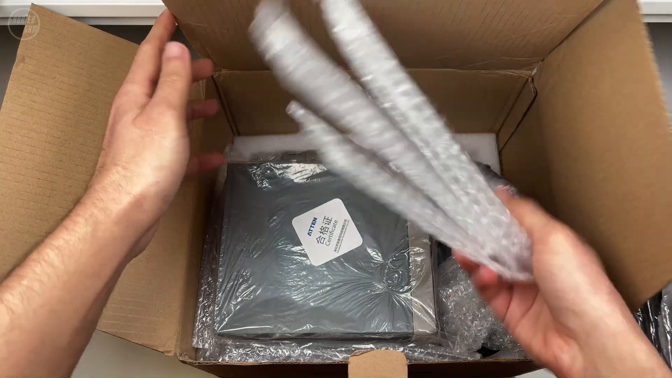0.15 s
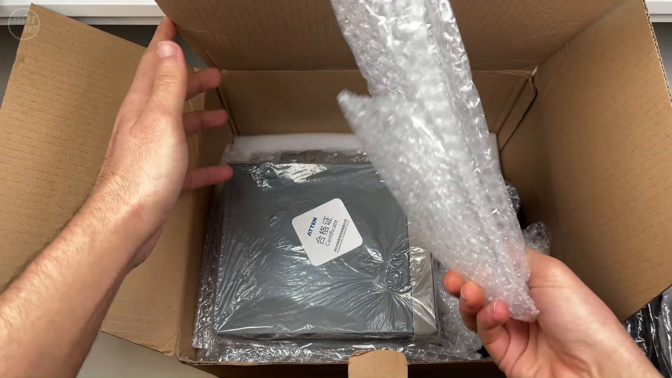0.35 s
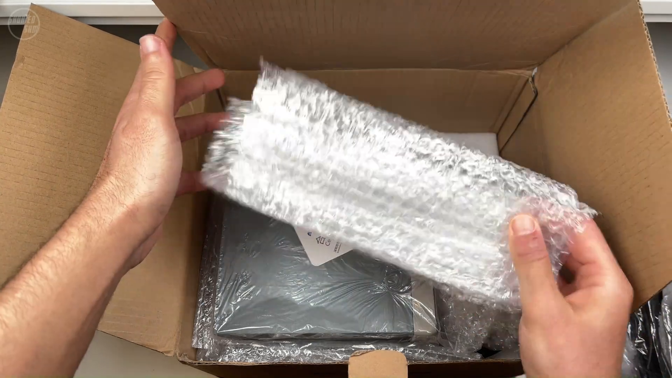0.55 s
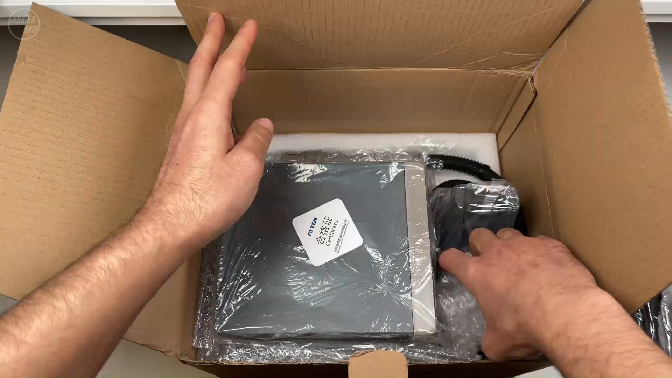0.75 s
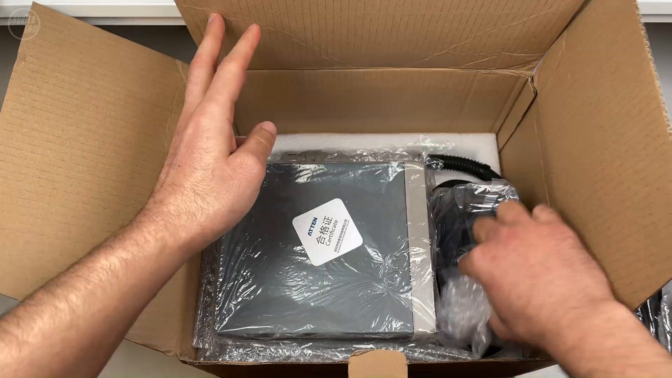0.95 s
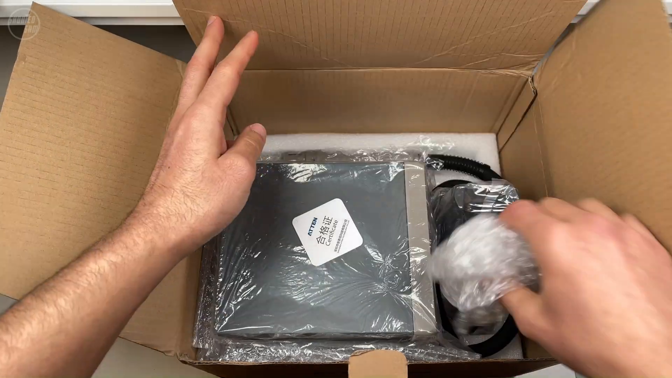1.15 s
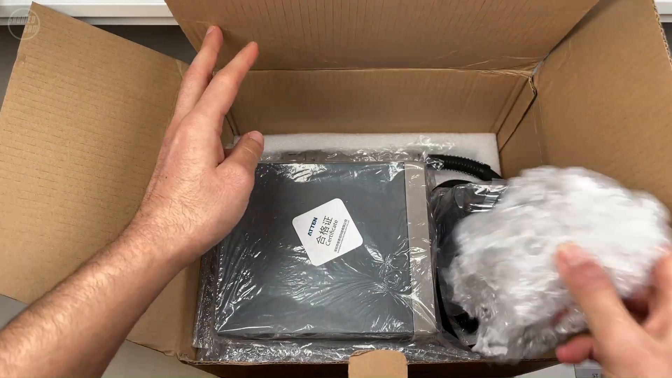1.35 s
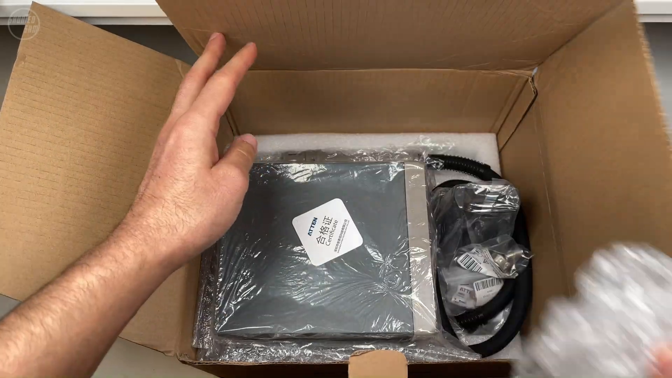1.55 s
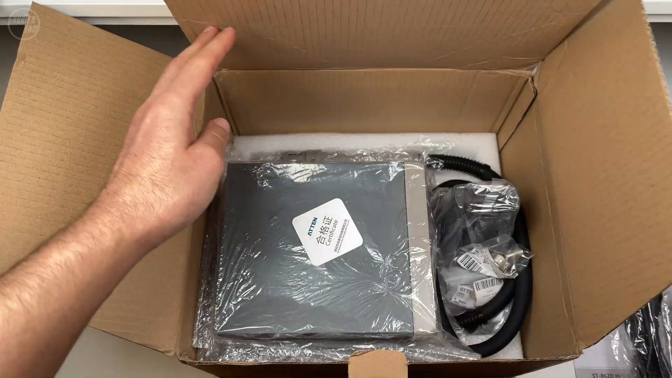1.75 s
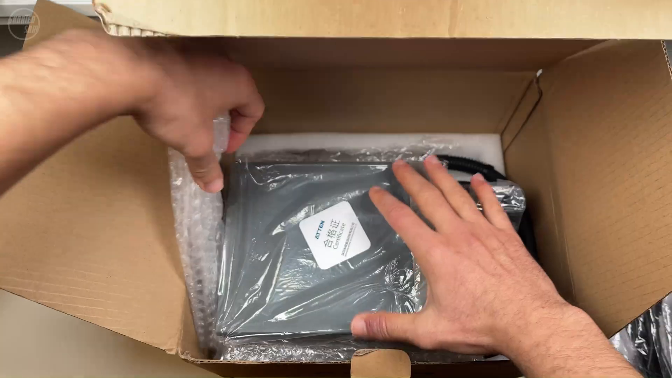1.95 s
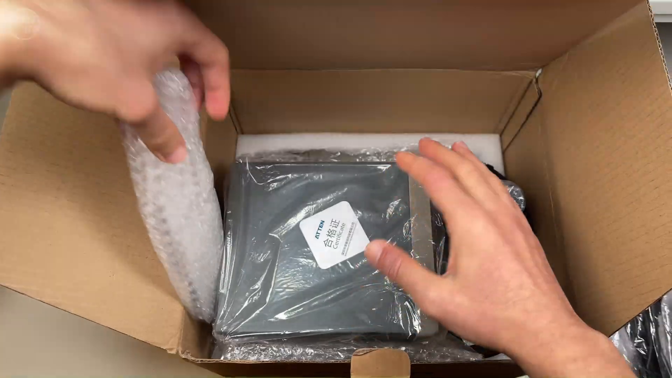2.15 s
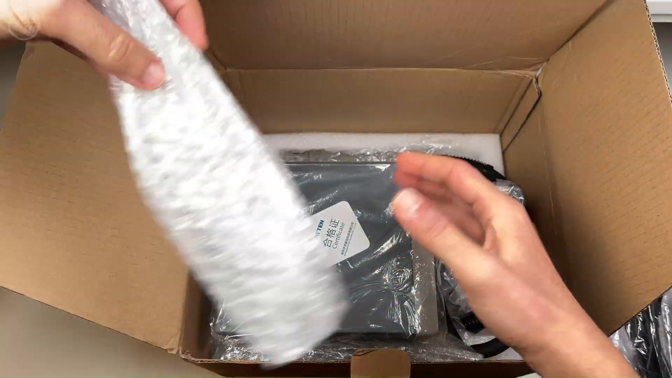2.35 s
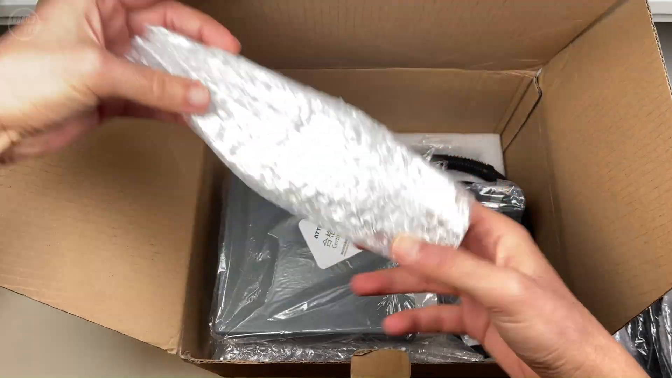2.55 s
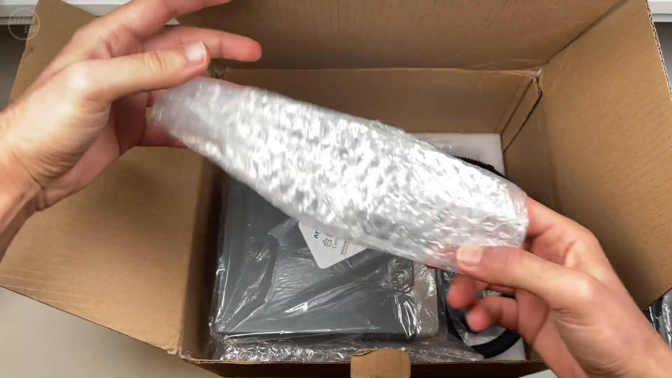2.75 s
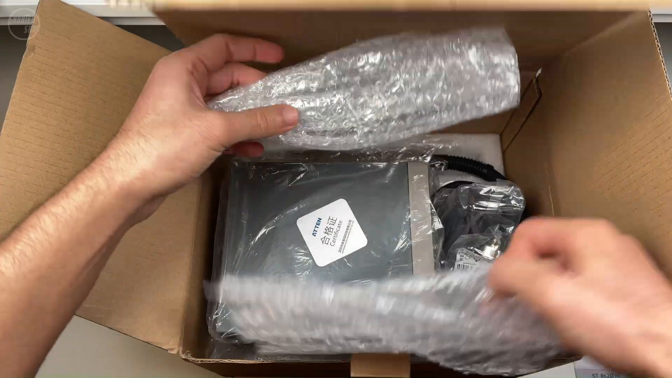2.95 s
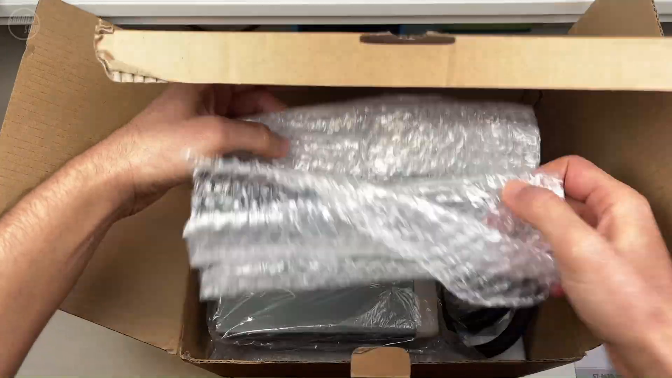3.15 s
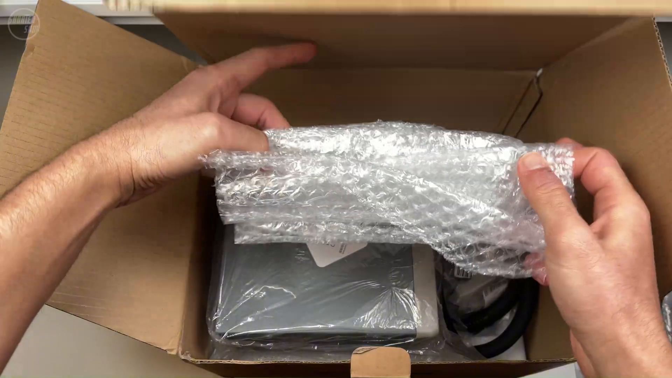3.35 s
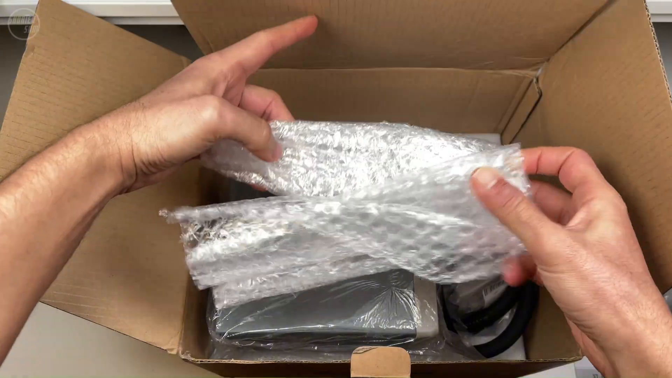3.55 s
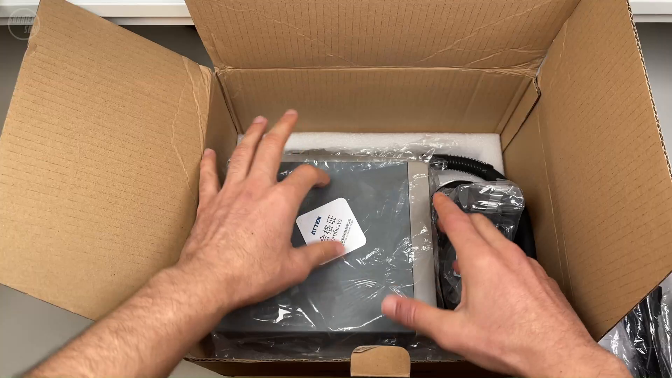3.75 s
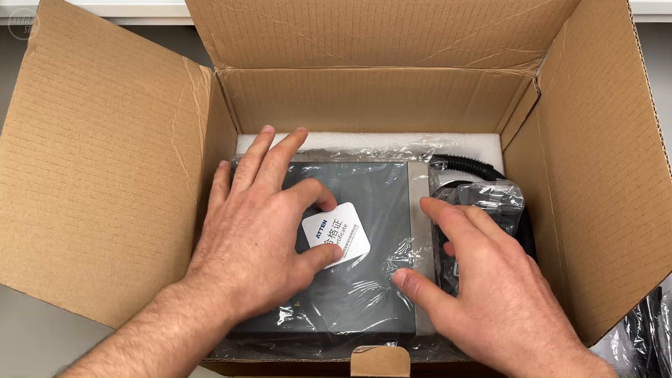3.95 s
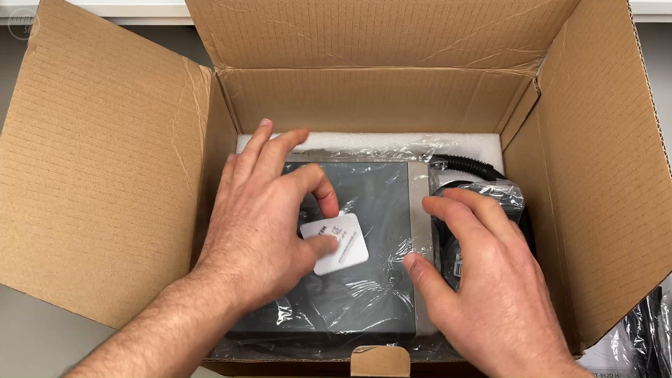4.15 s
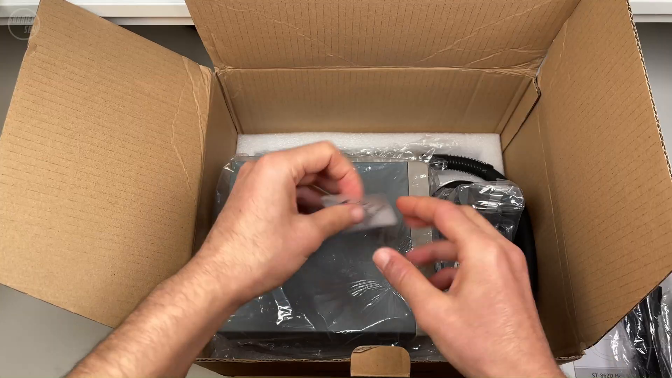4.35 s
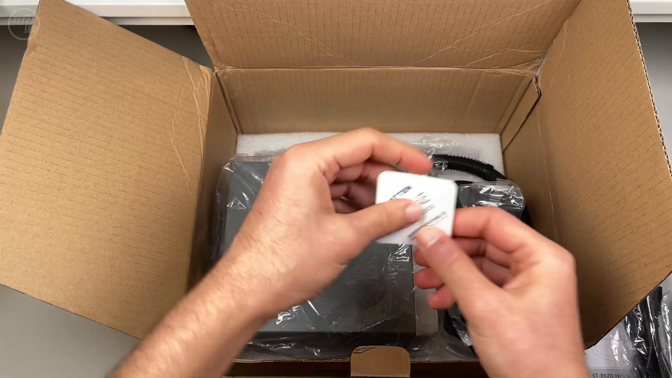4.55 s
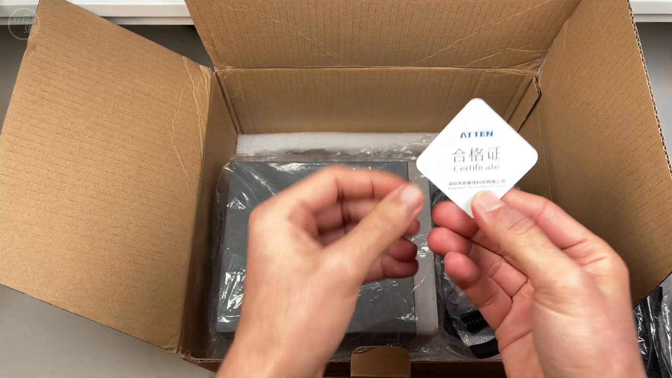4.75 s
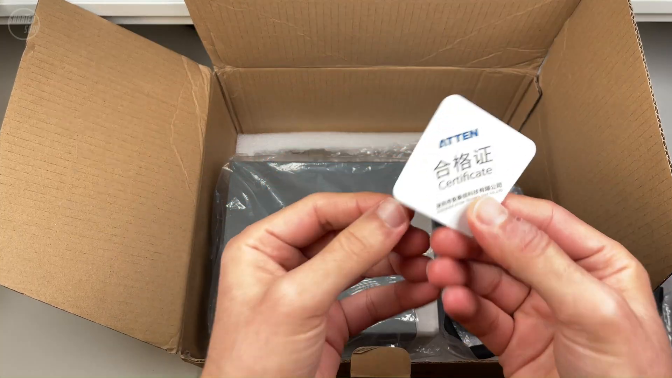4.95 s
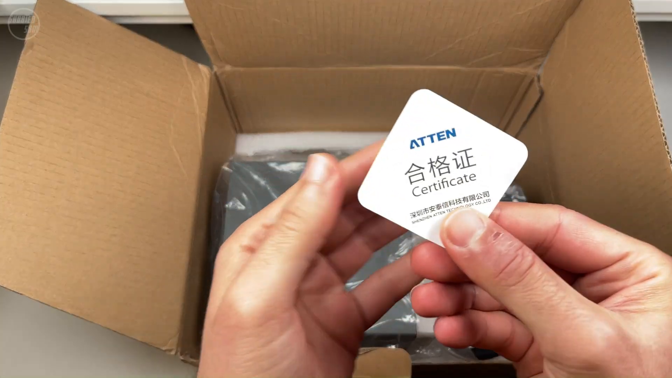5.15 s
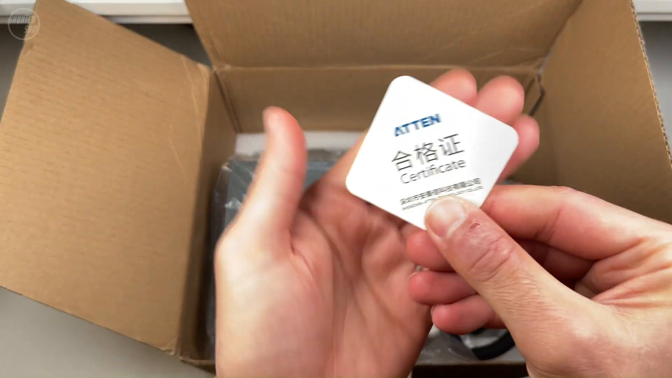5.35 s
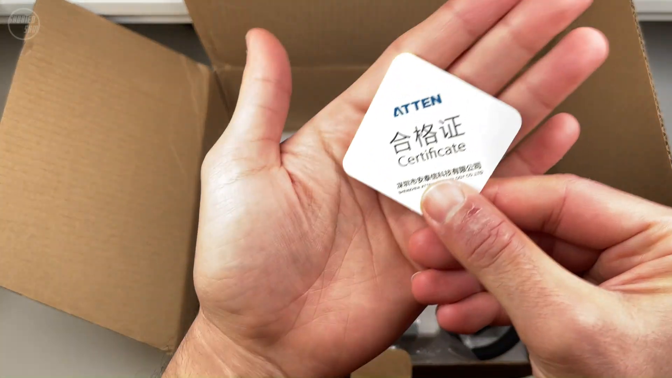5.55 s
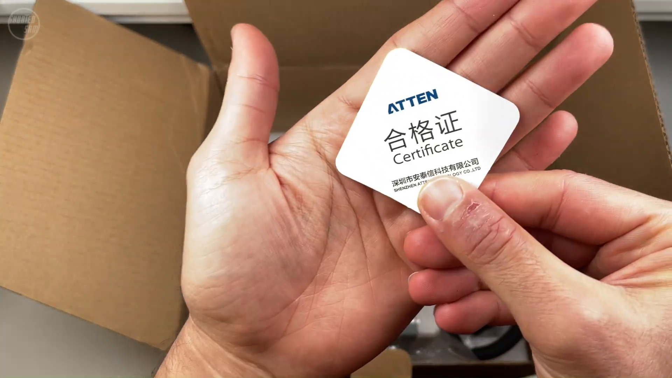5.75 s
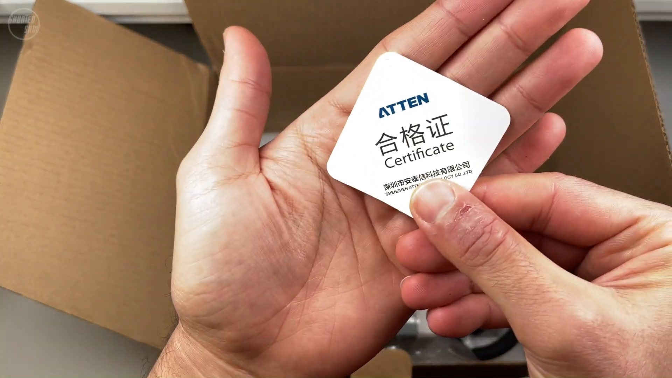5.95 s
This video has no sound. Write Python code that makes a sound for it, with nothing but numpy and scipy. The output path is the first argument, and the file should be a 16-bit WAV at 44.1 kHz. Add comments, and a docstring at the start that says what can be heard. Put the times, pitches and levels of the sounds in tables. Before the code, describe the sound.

Bubble wrap crackles and scrapes out of a cardboard box with hollow thuds, then a small stiff card peels loose with a snap.

```python
"""Bubble wrap crackles at once as hands pull it from a cardboard box: countless tiny snaps ring facets of film.
It drags on the walls as filtered catch-and-slip clicks; rubs and bumps set the modes of the box booming.
Big creases snap through, fingers judder on a metal lid, then a small card peels loose, flicks and ticks.
One microphone on a swaying stand, in a quiet room of soft low noise and a thin high whine."""
import sys
import numpy as np
from scipy import signal
from scipy.fft import rfft, irfft
from scipy.io import wavfile
from scipy.ndimage import uniform_filter1d

SR = 44100
rng = np.random.default_rng(int(sys.argv[2]) if len(sys.argv) > 2 else 0)


def wav_record(signal):
    """Record a signal, one row per channel, as 16-bit PCM in the file named by sys.argv[1]."""
    frames = np.transpose(np.atleast_2d(signal))
    bounded = np.clip(frames, -1, 1)
    # unit amplitude maps onto the largest positive 16-bit level
    quanta = np.round(bounded * 32767).astype(np.int16)
    wavfile.write(sys.argv[1], SR, quanta)


N = 264159


def undb(db):
    """Decibels to gain."""
    return 10 ** (np.asarray(db) / 20)


def unit(x):
    """Scale to rms 1."""
    return x / np.sqrt(np.mean(x ** 2))


def fader(times, db):
    """Gain along a dB curve, dying away at 130 dB per second beyond its ends."""
    t = np.arange(N) / SR
    outside = np.abs(t - np.clip(t, times[0], times[-1]))
    return undb(np.interp(t, times, db) - 130 * outside)


def gestures(rows, attack_s, swell_db, release_db_per_s):
    """Gain of overlapping movements (start s, length s, dB): attack, a hold that swells or sags, release."""
    t = np.arange(0, N, 32) / SR
    power = 0
    for start, length, db in rows:
        age = t - start
        attack = np.clip(age / attack_s, 0, 1)
        hold_db = swell_db * (np.clip(age / length, 0, 1) - .5)
        release_db = release_db_per_s * np.maximum(age - length, 0)
        power = power + (attack * undb(db + hold_db - release_db)) ** 2
    return np.interp(np.arange(N) / SR, t, np.sqrt(power))


def add(track, start, sound, db):
    """Mix a sound in at a time in seconds with the given peak level."""
    i = int(start * SR)
    scaled = sound * undb(db) / np.abs(sound).max()
    track[i:i + len(sound)] += scaled[:N - i]


def walk(rate):
    """Smooth random wander with a spread near 1, heading for a new value at the given rate in Hz."""
    k = max(int(SR / rate), 1)
    steps = rng.standard_normal(4096)
    held_steps = steps[np.arange(N) // k % len(steps)]
    return 1.2 * uniform_filter1d(held_steps, k)


def colour(x, points):
    """Causal minimum-phase filter through the given (Hz, dB) points."""
    hz, db = np.transpose(points)
    size = 2048
    f = np.maximum(np.arange(size // 2 + 1) * SR / size, 1)
    curve_db = np.interp(np.log(f), np.log(hz), db)
    # folding the cepstrum onto positive time makes the response causal
    cepstrum = irfft(np.log(undb(curve_db)))
    cepstrum[1:size // 2] *= 2
    cepstrum[size // 2 + 1:] = 0
    response = irfft(np.exp(rfft(cepstrum)))
    return signal.fftconvolve(x, response)[:len(x)]


def ring(modes, scatter_db=0):
    """Impulse response of damped modes; scatter varies their shares with where the blow lands."""
    t = np.arange(SR // 4) / SR
    out = 0
    for hz, db, t60 in modes:
        level = undb(db + scatter_db * rng.standard_normal())
        out = out + level * np.sin(2 * np.pi * hz * t) * np.exp(-np.log(1000) * t / t60)
    return out


def facet(x, hz, q):
    """One broad resonance of a patch of film."""
    hz = min(hz, SR / 3)
    b, a = signal.iirpeak(hz, max(q, 3 * hz / SR), fs=SR)
    return signal.lfilter(b, a, x)


def clicks(rate, spread_db):
    """Random impulses of either sign, most of them small and a few large, with rms 1."""
    out = np.zeros(N)
    chance = rng.random(N) * SR / rate
    hits = np.flatnonzero(chance < 1)
    size = np.minimum(-np.log(chance[hits]), 4.5)
    out[hits] = undb(spread_db * size) * (-1.) ** hits
    # busier stretches get smaller clicks, so density alone does not raise the level
    return unit(out / np.sqrt(rate))


# Tone curve of the crinkling film. Each row: frequency in Hz, relative filter gain in dB.
WRAP_TONE = [(200, -27), (500, -9), (1000, -3.5), (1700, 2), (2700, 0.5), (3700, -1.5), (4400, 2),
             (5200, -4), (6300, -7), (8500, -10.5), (10500, -17), (15000, -16)]
# Pulls on the wrap. Each row: start in seconds, length in seconds, crinkle level in dB before trims.
WRAP_PULLS = [(0.0, 0.0282, -53), (0.1, 0.1845, -50.5), (0.328, 0.0173, -54.5), (0.405, 0.052, -59),
              (0.48, 0.1177, -49), (0.635, 0.031, -55), (0.768, 0.081, -51.5), (0.86, 0.188, -45.5),
              (1.06, 0.15, -50.5), (1.185, 0.217, -47), (1.425, 0.031, -47.5), (1.592, 0.0436, -60.5),
              (1.73, 0.0695, -53.5), (1.785, 0.1816, -47.5), (2.0, 0.107, -52.5), (2.125, 0.197, -45.5),
              (2.405, 0.024, -56.5), (2.5, 0.0406, -59.5), (2.63, .035, -47.5), (2.675, 0.0091, -45.5),
              (2.8, 0.2143, -45), (3.05, 0.0983, -51), (3.195, 0.12, -49.5), (3.383, 0.0177, -46),
              (3.508, 0.0277, -48), (3.6, 0.1277, -47.5), (3.73, 0.021, -55.5), (3.885, 0.036, -55),
              (4.085, 0.0123, -65.5), (4.172, .02, -62)]
# a pull strains the wrap more and more, then lets it relax
PULL_ATTACK_S, PULL_SWELL_DB, PULL_RELEASE_DB_PER_S = 0.0241, 2.5, 176.5
# wrap that is merely held keeps ticking faintly; level before trims, fading out from the given time
HELD_UNTIL_S, HELD_DB = 3.8, -61.5


def wrap():
    """Film facets of every size buckle; stronger pulls make more of them snap, and the level flutters."""
    pulled = gestures(WRAP_PULLS, PULL_ATTACK_S, PULL_SWELL_DB, PULL_RELEASE_DB_PER_S)
    held = fader([0, HELD_UNTIL_S], [HELD_DB, HELD_DB])
    gain = np.hypot(pulled, held)
    effort = gain / gain.max()
    base_rate = 60 + 650 * effort
    film = 0
    for hz in np.geomspace(900, 13000, num=10):
        # small, high-pitched facets outnumber the large ones, and the strain moves among the sizes
        facet_rate = base_rate * (hz / 3000) ** .7
        snaps = clicks(facet_rate, spread_db=1.5) * undb(0.95 * walk(29.93))
        film = film + np.sqrt(hz) * facet(snaps, hz, q=2.87)
    flutter = undb(1.5 * walk(80) - 0.17)
    return unit(colour(film, WRAP_TONE)) * gain * flutter


# Tone curve of wrap scraping on cardboard. Each row: frequency in Hz, relative filter gain in dB.
SCRAPE_TONE = [(150, 0.5), (350, -1), (490, -5), (650, -1.5), (880, -1), (1300, -4), (1900, -3.5),
               (2800, -7.5), (5000, -23)]
# Rubs along the box, for scrape and walls alike. Each row: start in seconds, length in seconds,
# scraping level in dB and boom level of the walls in dB, both before trims.
BOX_RUBS = [(0.0, .17, -61, -76), (0.187, 0.051, -55, -48.5), (0.343, 0.051, -75.5, -51.5),
            (0.472, 0.217, -59.5, -61), (0.782, 0.078, -52, -50), (0.871, 0.243, -50, -54),
            (1.188, 0.294, -56.5, -62), (1.446, 0.11, -65, -56.5), (1.561, 0.1475, -63, -53.5),
            (1.762, 0.22, -53, -56), (1.873, 0.067, -42, -40.5), (1.992, 0.0453, -44, -39),
            (2.085, 0.078, -49, -47), (2.138, 0.0615, -47, -42), (2.221, 0.0984, -50, -38.5),
            (2.396, 0.0277, -51.5, -43.5), (2.534, 0.1035, -61, -45.5), (2.676, 0.0194, -50.5, -48),
            (2.799, 0.148, -47.5, -50), (2.949, 0.0776, -45.5, -46), (3.065, 0.117, -62.5, -57),
            (3.193, 0.048, -55, -54), (3.3, 0.067, -47.5, -44), (3.403, 0.0221, -41, -39),
            (3.493, 0.211, -55.5, -47.5), (3.679, 0.0533, -50.5, -60.5), (3.88, 0.0447, -58, -43.5),
            (4.071, 0.0268, -65, -51.5)]
# a rub bites at once and eases off as the wrap slides
RUB_ATTACK_S, RUB_SAG_DB, SCRAPE_RELEASE_DB_PER_S = 0.0163, 4, 234.5


def scrape():
    """Bubbles catch and slip on the cardboard: a dense run of clicks with a wavering level."""
    start, length, scrape_db, _ = np.transpose(BOX_RUBS)
    rubs = zip(start, length, scrape_db)
    gain = gestures(rubs, RUB_ATTACK_S, -RUB_SAG_DB, SCRAPE_RELEASE_DB_PER_S)
    slips = clicks(1800, spread_db=2.5)
    return unit(colour(slips, SCRAPE_TONE)) * gain * undb(1.97 * walk(55) + 0.5)


# Modes of the cardboard walls and the air between them.
# Each row: frequency in Hz, relative level in dB, 60 dB decay time in seconds.
BOX_MODES = [(50.32, -19.5, 0.12), (73.4, -3.5, 0.304), (102.43, 4, 0.183), (126.95, -3.5, 0.336),
             (156, -1, 0.265), (203.11, 2.5, 0.199), (227.32, 3, 0.282), (240.9, -1.5, 0.326),
             (314.84, -1, 0.185), (368.7, -26.5, 0.059), (451, -11, 0.05), (553.2, -8.5, 0.0517),
             (639.3, -2, 0.031)]
# Bumps of hands and wrap in and over the box. Each row: start in seconds, peak level in dB,
# contact time in seconds.
BOX_BUMPS = [(0.196, -39.5, 0.00195), (0.352, -45.5, 0.00435), (0.66, -42.5, 0.0067), (0.78, -37, 0.00194),
             (1.085, -38.5, 0.00261), (1.448, -35, 0.0065), (1.606, -38, 0.0038), (1.895, -30, 0.00153),
             (1.914, -30.5, 0.0021), (2.011, -31, 0.00166), (2.161, -29.5, 0.00126), (2.377, -34, 0.0116),
             (2.544, -22.5, 0.00633), (2.634, -30.5, 0.01166), (3.028, -30, 0.00627), (3.327, -32, 0.00189),
             (3.425, -24.5, 0.00153), (3.61, -35.5, 0.001), (3.686, -36.5, 0.0066), (3.898, -43, 0.00146),
             (5.344, -44.5, 0.00225)]
BOOM_RELEASE_DB_PER_S = 153  # slower than the scrape, so the walls boom on after it stops


def walls():
    """Dragging keeps the box booming; a bump pushes it once, longer, softer contact giving a deeper thud."""
    start, length, _, boom_db = np.transpose(BOX_RUBS)
    rubs = zip(start, length, boom_db)
    gain = gestures(rubs, RUB_ATTACK_S, -RUB_SAG_DB, BOOM_RELEASE_DB_PER_S)
    panels = 0
    # three panels boom together, each with its own mode balance and wandering level
    for _ in range(3):
        panel = signal.oaconvolve(clicks(700, spread_db=2.5), ring(BOX_MODES, scatter_db=0.5))[:N]
        panels = panels + unit(panel) * undb(1.365 * walk(14))
    out = unit(panels) * gain * undb(-0.5)
    for start, db, contact in BOX_BUMPS:
        push = np.hanning(max(int(contact * SR), 8))
        add(out, start, signal.fftconvolve(ring(BOX_MODES, scatter_db=5.5), push), db)
    return out


# Nudges of the table. Each row: start in seconds, length in seconds, sway level in dB.
TABLE_NUDGES = [(0.0, 0.481, -47), (0.9, 0.566, -45.5), (1.92, 0.283, -33), (2.45, 0.201, -47),
                (2.84, 0.236, -38.5), (3.3, 0.296, -47), (3.7, 0.52, -35)]
# a nudge sets the stand swaying and it slowly settles to its resting sway
SWAY_ATTACK_S, SWAY_SAG_DB, SWAY_RELEASE_DB_PER_S, SWAY_REST_DB = 0.0567, 7, 58.5, -58


def stand():
    """The microphone stand sways in two very low modes, more so whenever the table is nudged."""
    t = np.arange(N) / SR
    sway = 0
    for hz, db in [(14.5, 4.5), (26, -5.5)]:
        wandering_phase = 0.969 * walk(6.4)
        sway = sway + undb(db) * np.sin(2 * np.pi * hz * t + wandering_phase)
    nudged = gestures(TABLE_NUDGES, SWAY_ATTACK_S, -SWAY_SAG_DB, SWAY_RELEASE_DB_PER_S)
    return unit(sway) * np.hypot(nudged, undb(SWAY_REST_DB))


# Tone curve of the room noise. Each row: frequency in Hz, relative filter gain in dB.
ROOM_TONE = [(20, -9), (42, -2.5), (65, -2.5), (100, -16.5), (160, -13.5), (240, -17), (370, -22.5),
             (550, -27.5), (1100, -30.5), (3000, -34.5), (13000, -38.5)]
ROOM_DB, WHINE_HZ, WHINE_DB = -64.5, 15607.5, -64  # rms levels; the room noise wanders around its own


def background():
    """Filtered noise gives a low room hum and faint hiss; a sine gives a steady electronic whine."""
    air = unit(colour(rng.standard_normal(N), ROOM_TONE)) * undb(ROOM_DB + .5 * walk(5))
    whine = unit(np.sin(2 * np.pi * WHINE_HZ * np.arange(N) / SR))
    return air + undb(WHINE_DB) * whine


# Big creases snapping through. Each row: start in seconds, peak level in dB before echoes, pitch in Hz.
BIG_CREASES = [(0.238, -30.5, 4300), (0.342, -33.5, 4368), (0.655, -35.5, 2320), (0.783, -44.5, 2500),
               (1.381, -27, 2150), (1.4112, -33.5, 2740), (1.441, -37, 6970), (1.6, -35, 5000),
               (1.634, -38.5, 1738), (1.66, -43, 5500), (1.811, -29.5, 2140), (1.883, -26, 1810),
               (2.002, -30.5, 1500), (2.139, -33, 1800), (2.272, -27.5, 1620), (2.356, -37, 4000),
               (2.637, -34, 4230), (2.686, -27, 2350), (2.692, -26.5, 3990), (2.740, -36.5, 3830),
               (2.777, -40, 4833), (2.817, -35, 2380), (2.827, -31, 4500), (3.126, -32.5, 3330),
               (3.274, -33.5, 4400), (3.410, -29, 1990), (3.418, -33, 1800), (3.772, -32, 2540),
               (3.779, -31.5, 2490), (4.189, -44.5, 3490)]


def creases():
    """A big fold snaps through in about one cycle and the film around it shivers."""
    out = np.zeros(N)
    t = np.arange(2048) / SR
    for start, db, hz in BIG_CREASES:
        shiver = .16 * rng.standard_normal(len(t)) * np.exp(-t / .0035)
        snap = (t == 0) + shiver
        add(out, start, facet(facet(snap, hz, q=1.0), hz, q=0.336), db)
    return out


# Modes of the metal lid. Each row: frequency in Hz, relative level in dB, 60 dB decay time in seconds.
LID_MODES = [(249.1, 6.5, 0.4), (325.5, 2.5, 0.096), (913, -10.5, 0.104), (983, -9.5, 0.134),
             (1028, 2, 0.157), (1078, -1.5, 0.117)]
# Finger slips on the wrapped lid. Each row: start in seconds, peak level in dB before echoes,
# length in seconds.
LID_SLIPS = [(3.889, -42.5, 0.0312), (3.926, -40, 0.0244), (4.081, -58.5, 0.0362)]


def lid():
    """Fingers judder over the wrapped metal lid: swelling noise bursts make its modes ring briefly."""
    out = np.zeros(N)
    for start, db, length in LID_SLIPS:
        window = np.hanning(max(int(length * SR), 8))
        judder = window * rng.standard_normal(len(window))
        add(out, start, signal.fftconvolve(ring(LID_MODES), judder), db)
    return out


# Tone curve of tearing glue. Each row: frequency in Hz, relative filter gain in dB.
PEEL_TONE = [(400, -8.5), (1500, -3.5), (2600, 4.5), (4500, 1.5), (7000, 1), (9500, -10), (11500, -10),
             (15000, -13)]
# The card's glue letting go. Each row: time in seconds, level in dB before echoes.
PEEL_LEVELS = [(4.2, -92), (4.26, -65.5), (4.286, -54), (4.3, -49.5), (4.311, -45.5), (4.314, -46),
               (4.322, -81)]


def peel():
    """The card's glue tears in a rising crackle of fine clicks."""
    crackle = colour(clicks(2500, spread_db=1), PEEL_TONE)
    times, db = np.transpose(PEEL_LEVELS)
    return unit(crackle) * fader(times, db)


# Tone curve of the flexing card. Each row: frequency in Hz, relative filter gain in dB.
CARD_TONE = [(100, -11.5), (450, -6.5), (750, -2.5), (1050, -4), (1500, -2.5), (2800, 3), (4500, -2),
             (5900, -7.5), (7000, -13), (9300, -14), (10500, -24.5), (15000, -26)]
# Modes of the card. Each row: frequency in Hz, relative level in dB, 60 dB decay time in seconds.
CARD_RING = [(760, 1.5, 0.048), (1019, -2.5, 0.055), (1211, -7, 0.067), (2437, 2, 0.063),
             (2940, -16.5, 0.051), (4030, -7.5, 0.1), (4500, -11.5, 0.05), (5900, -19, 0.071)]
# The card flexing. Each row: start in seconds, peak level in dB before echoes,
# decay time constant in seconds, brightness in dB per octave.
CARD_FLICKS = [(4.3221, -23.5, 0.00164, 0.5), (4.325, -20, 0.004, -1), (4.331, -30.5, 0.0132, -0.5),
               (4.427, -51, 0.00157, 0), (4.5438, -44.5, 0.0017, 2.5), (4.551, -44.5, 0.0085, -4),
               (4.801, -49, 0.00157, -3.5), (5.095, -50, 0.0073, -1.5), (5.172, -58, 0.0018, 6.5),
               (5.334, -54, 0.0043, 1), (5.34, -37.5, 0.00458, 2), (5.498, -50.5, 0.00137, -0.5),
               (5.539, -59.5, 0.0026, -2), (5.624, -53, 0.00224, 1)]


def flicks():
    """The stiff card springs free and later flexes in the fingers: noise cracks with a faint modal ring."""
    out = np.zeros(N)
    t = np.arange(SR // 5) / SR
    modes = ring(CARD_RING)
    for start, db, decay, bright in CARD_FLICKS:
        flex = rng.standard_normal(len(t)) * np.exp(-t / decay)
        # an edge catching on a nail is brighter than the whole card bending
        tilted = [(hz, level + bright * np.log2(hz / 2500)) for hz, level in CARD_TONE]
        ringing = signal.fftconvolve(flex, modes)[:len(t)]
        add(out, start, colour(flex, tilted) + undb(-46.5) * ringing, db)
    return out


def echoes(x, clouds):
    """Dense, decaying clouds of reflections, each (dB, t60 s), with dulled treble."""
    t = np.arange(SR // 3) / SR
    tail = 0
    for db, t60 in clouds:
        cloud = rng.standard_normal(len(t)) * np.exp(-np.log(1000) * t / t60) * (t > .0015)
        tail = tail + undb(db) * cloud / np.linalg.norm(cloud)
    dulling = [(150, -2.0), (600, -0.5), (2500, -2), (4500, -2.0), (8000, -6.0), (14000, -9.5)]
    return signal.oaconvolve(x, colour(tail, dulling))[:N]


def space(x, box_db, room_db, room_t60, count=6):
    """Quick echoes between the box flaps and a short room tail; their pattern shifts as the hands move."""
    # a random wander shares the sound among several echo patterns, keeping their summed power even
    places = np.array([walk(12) for _ in range(count)])
    places /= np.linalg.norm(places, axis=0)
    box_t60 = .05
    return x + sum(echoes(x * share, [(box_db, box_t60), (room_db, room_t60)]) for share in places)


def scene():
    """Handling sounds echo in box and room, joined by boom, sway and background, alike on both sides."""
    handling = undb(-1.0) * (wrap() + scrape())
    near = handling + creases() + lid() + peel() + flicks()
    echoed = space(near, box_db=-6.0, room_db=-12.5, room_t60=0.199)
    mono = echoed + walls() + stand() + background()
    return np.array([mono, mono])


TOP_HZ = 15900  # passband edge


def record(dry):
    """The recorder cuts the top with a very steep elliptic low-pass."""
    low_pass = signal.ellip(12, .1, 80, TOP_HZ, fs=SR, output="sos")
    return signal.sosfilt(low_pass, dry)


dry = scene()
out = record(dry)
wav_record(out)
```